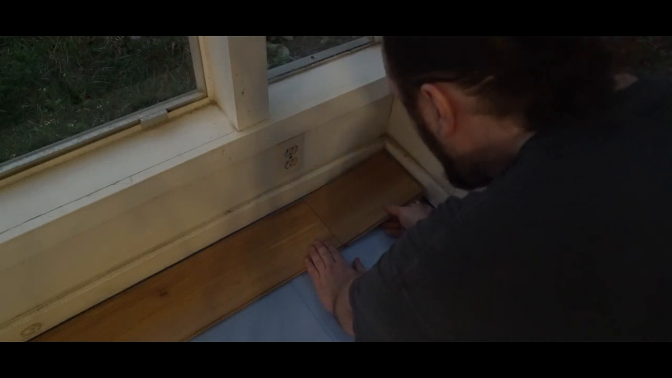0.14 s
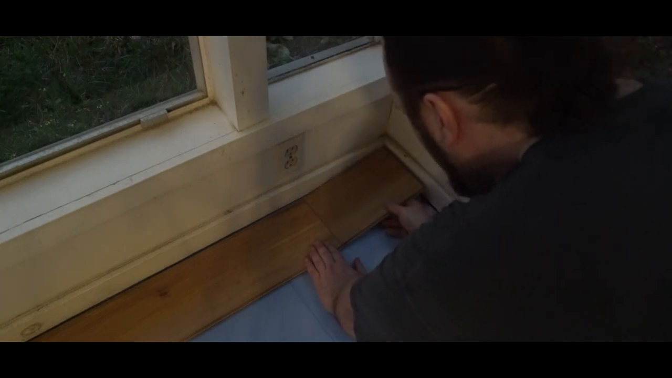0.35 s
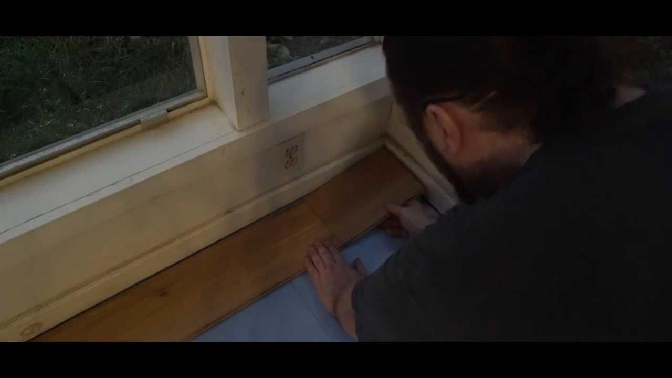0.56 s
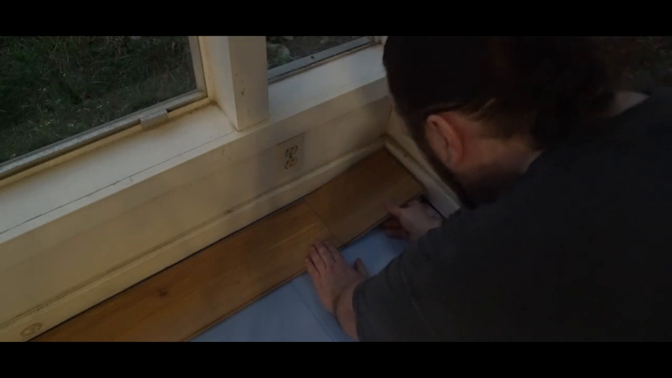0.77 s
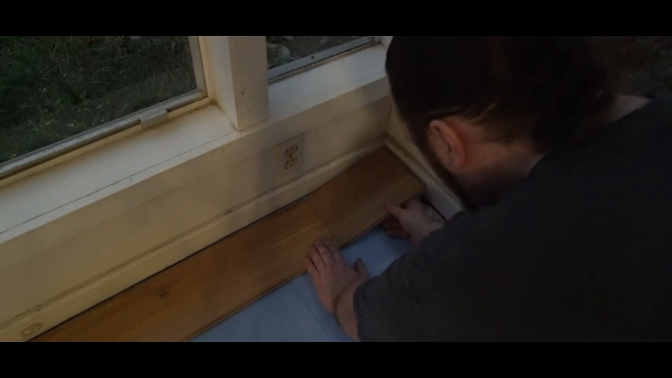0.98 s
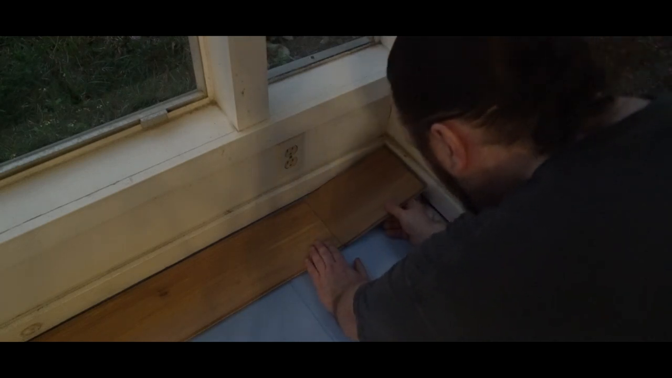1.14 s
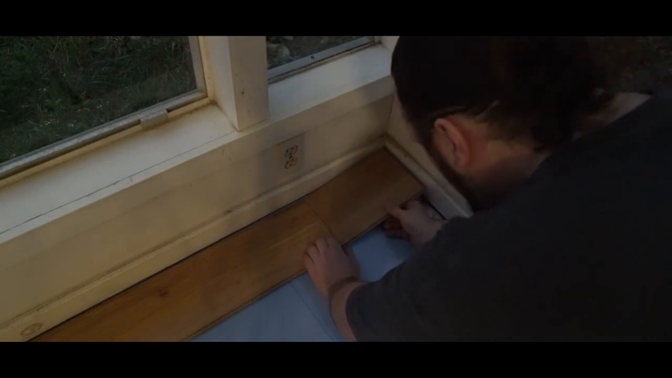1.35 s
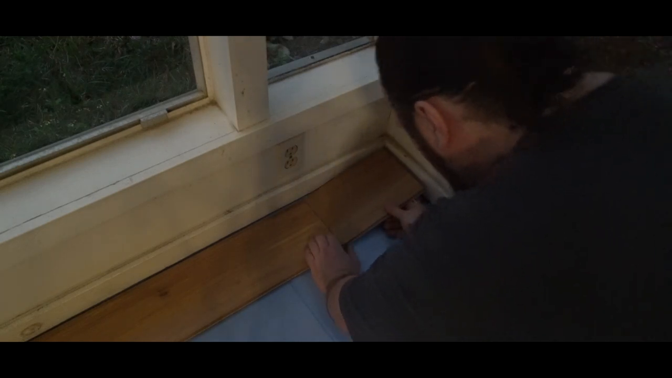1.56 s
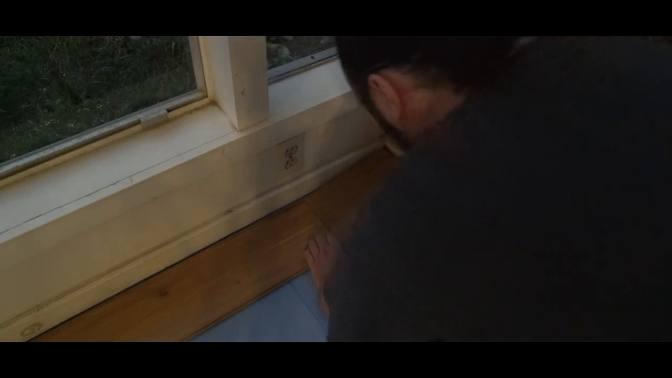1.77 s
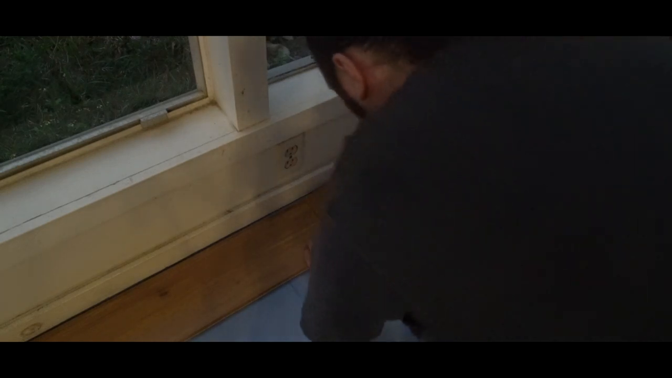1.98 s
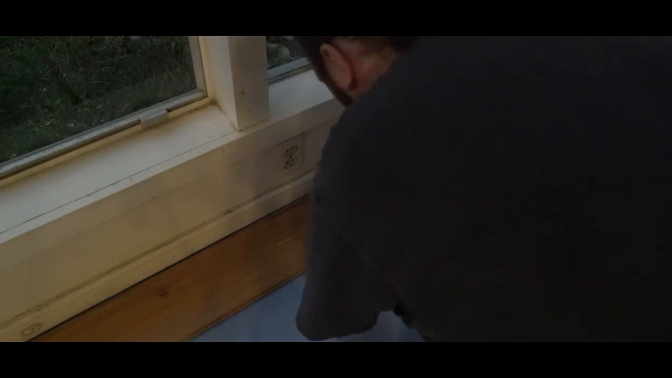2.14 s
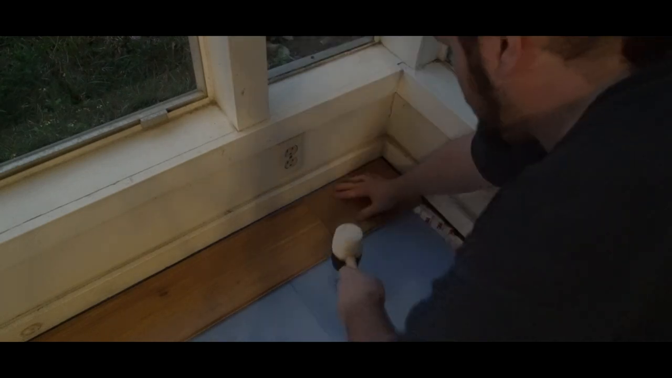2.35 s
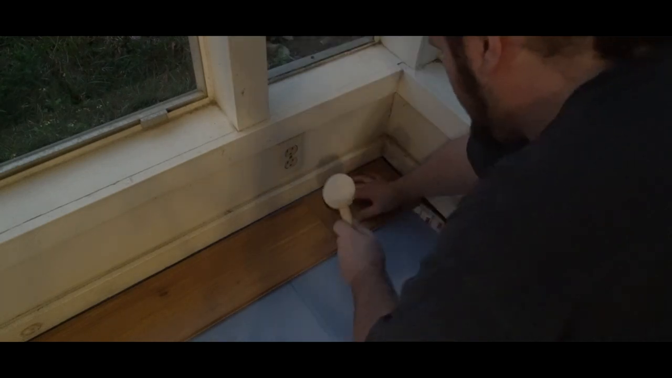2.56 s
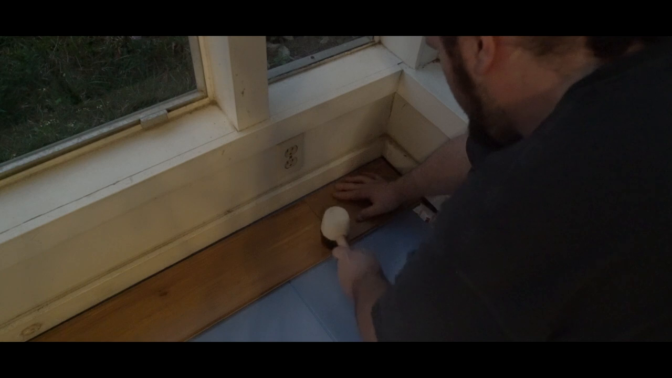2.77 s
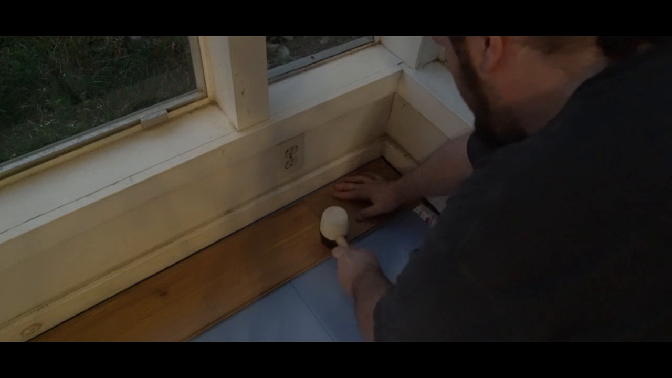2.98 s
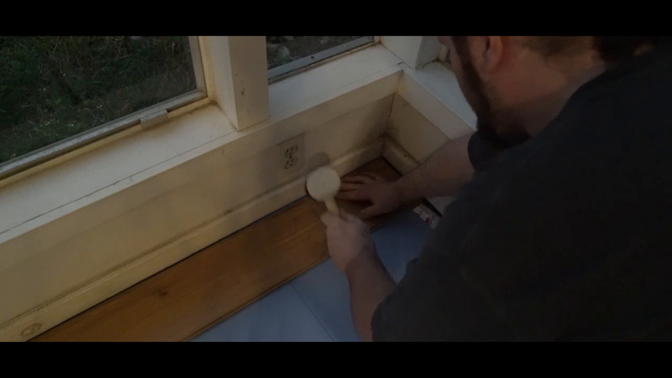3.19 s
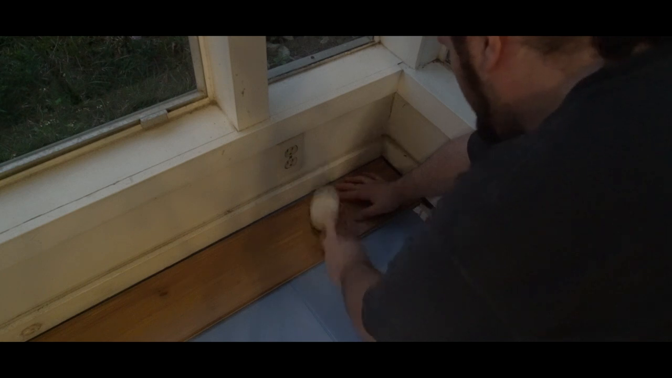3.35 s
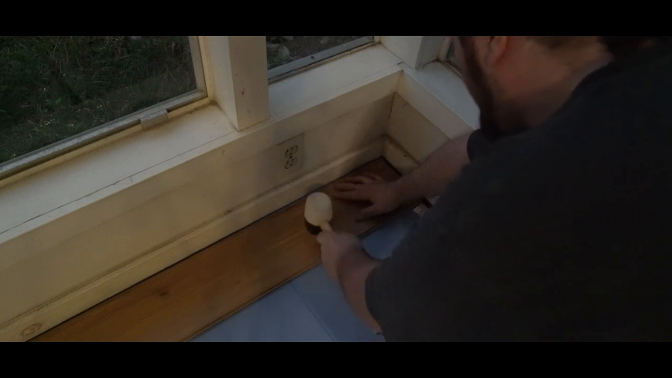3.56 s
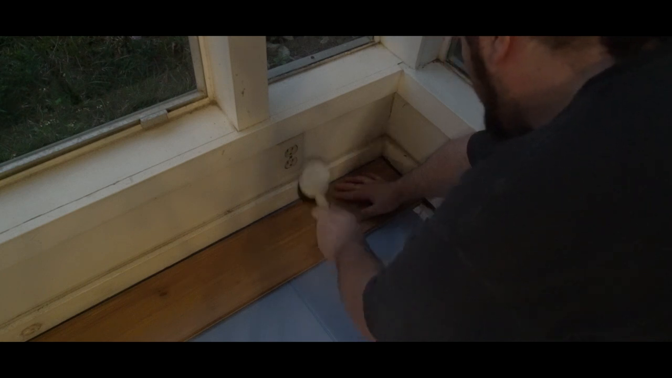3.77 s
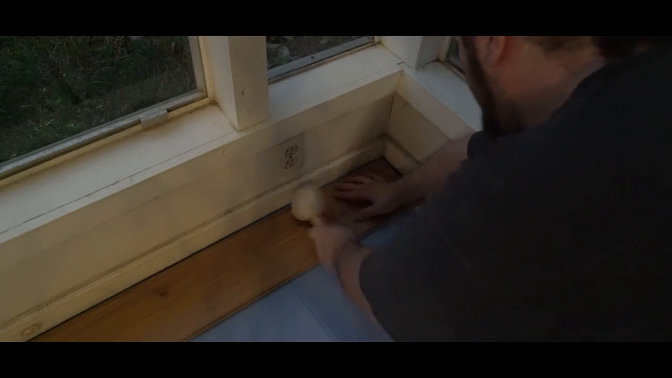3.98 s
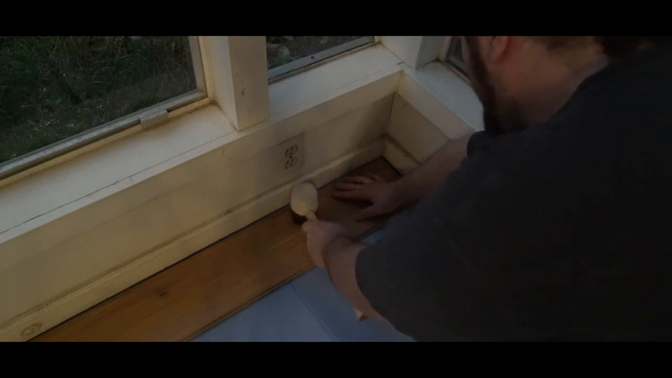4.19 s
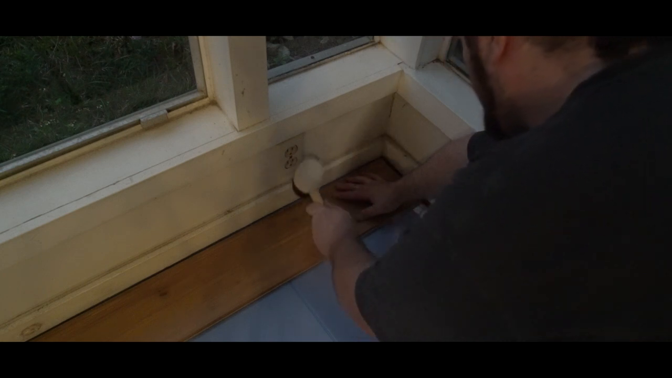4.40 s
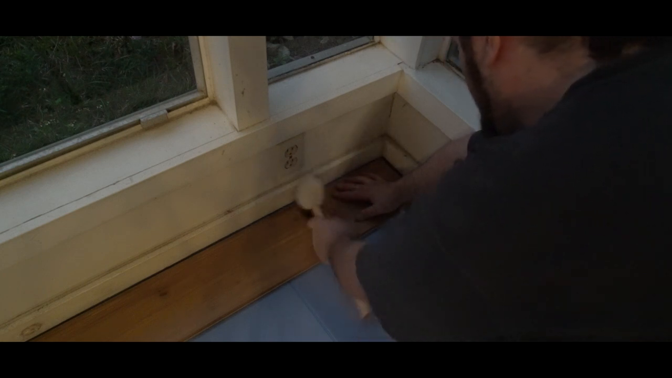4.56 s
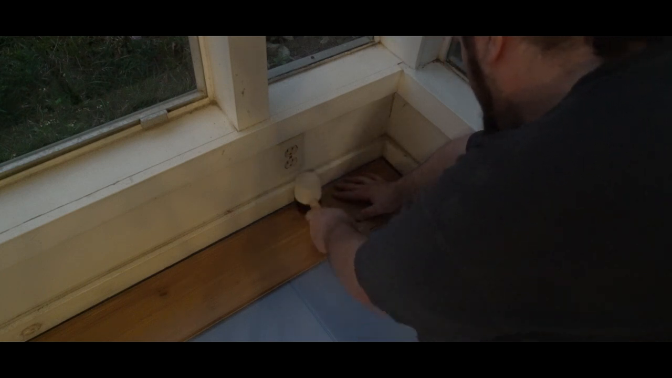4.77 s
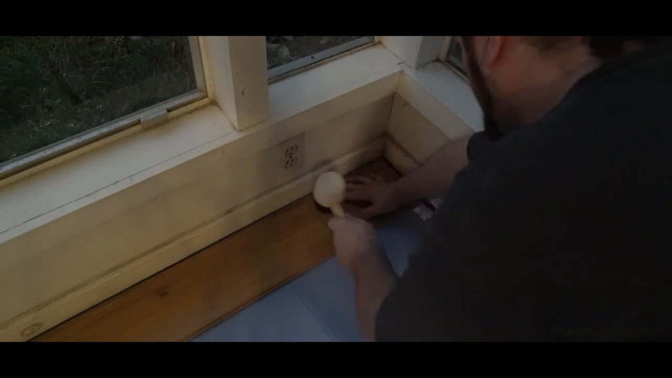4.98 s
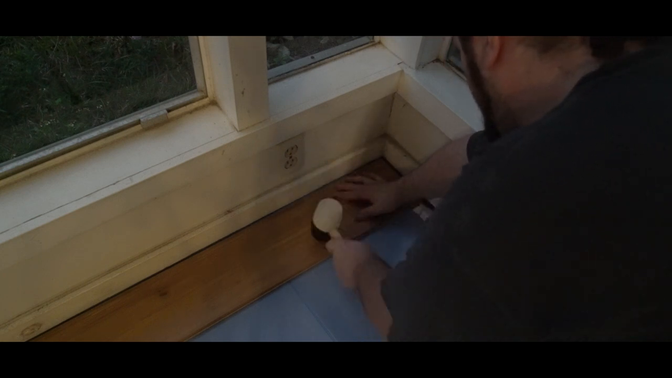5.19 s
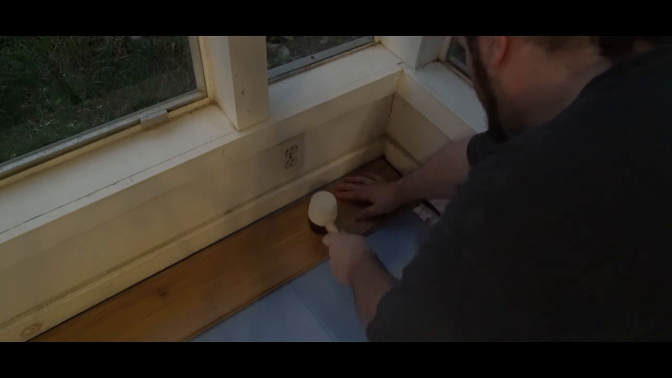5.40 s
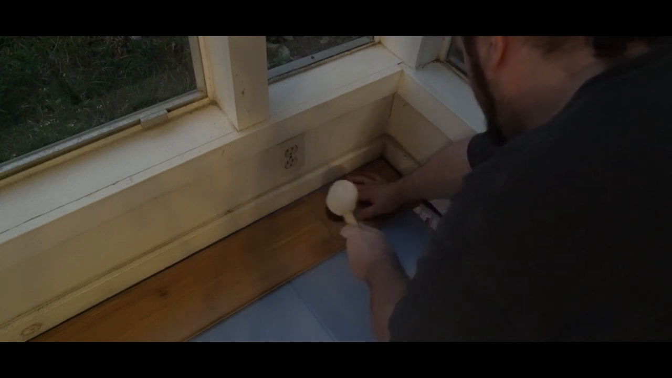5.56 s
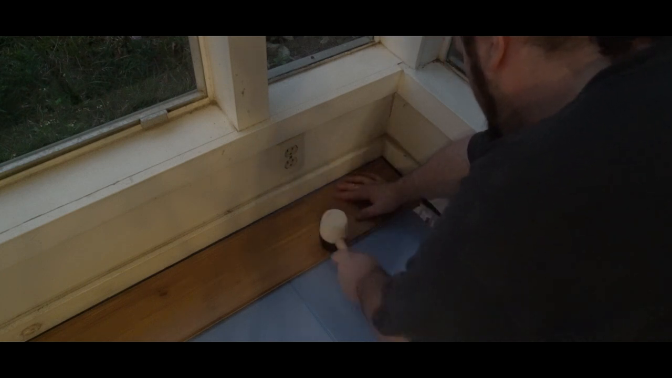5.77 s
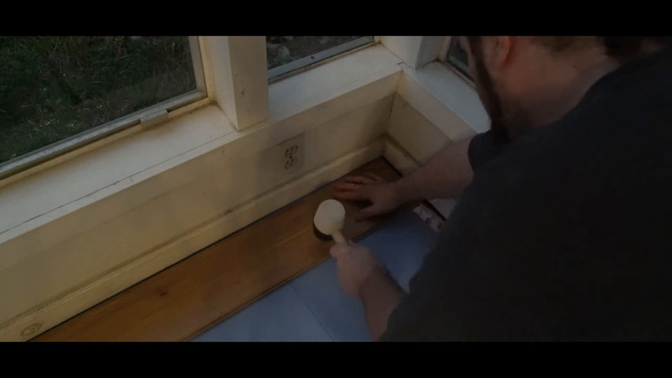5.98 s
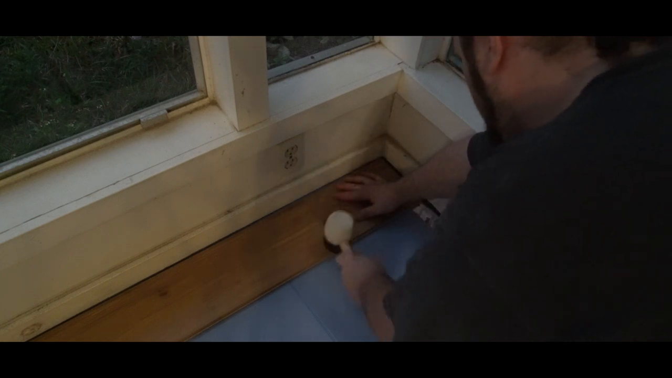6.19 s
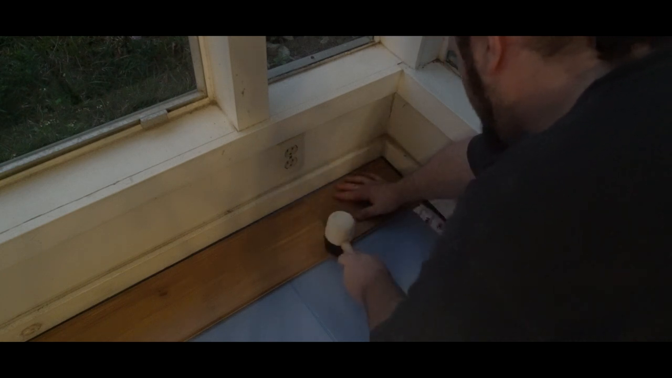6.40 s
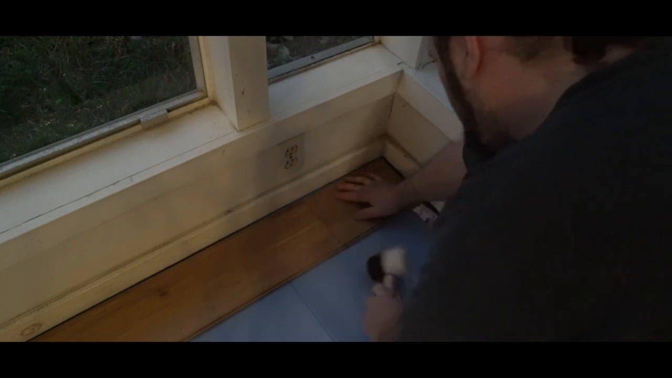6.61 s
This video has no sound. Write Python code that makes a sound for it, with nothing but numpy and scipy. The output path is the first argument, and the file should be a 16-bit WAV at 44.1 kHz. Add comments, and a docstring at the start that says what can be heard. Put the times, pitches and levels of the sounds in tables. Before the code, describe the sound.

Close in a bare, echoing room with very faint hum and hiss, hands softly rub a laminate plank; its edge squeaks thinly, the joint ticks and the board scrapes briefly. After a pause, seven very loud mallet blows crack against the wood at a steady, slightly quickening pace, each with a short woody ring and an echo lasting over half a second.

```python
"""A laminate plank is fitted in the corner of a bare, echoing room, over a faint hum and hiss that sink at 2.33 s.
Hands rub along the boards (shaped noise), the edge squeaks (blurred tones), the joint ticks (small struck modes),
and one short push slides the plank over its underlay, creeping, then giving way. From 2.7 s seven mallet blows
drive it home: each snaps and cracks, rings the plank's modes and fills the room with echo; two seating cracks
follow the first blow. The recorder's limiter ducks the peaks, so the echo swells up just after a crack."""
import sys
import numpy as np
from scipy import signal
from scipy.fft import rfft, irfft
from scipy.io import wavfile
from scipy.ndimage import minimum_filter1d

SR = 44100
rng = np.random.default_rng(int(sys.argv[2]) if len(sys.argv) > 2 else 0)


def log_audio(samples):
    """Write samples as a 16-bit WAV file to the path given in sys.argv[1]."""
    # one column per channel
    frames = np.atleast_2d(samples).T
    # limit to full scale, then quantise
    limited = np.clip(frames, -1, 1)
    pcm = np.round(limited * 32767).astype(np.int16)
    wavfile.write(sys.argv[1], SR, pcm)


N = 292779
TIME = np.arange(N) / SR
AGE = TIME[:3 * SR // 2]  # time since an impact [s]


def from_db(db):
    """Decibels to amplitude gain."""
    return 10 ** (np.asarray(db) / 20)


def rms_one(x):
    """Scale to unit power."""
    return x / np.sqrt(np.mean(x ** 2) + 1e-20)


def at_hz(points, hz):
    """Interpolate a table on a log-frequency axis."""
    freqs, values = np.transpose(points)
    return np.interp(np.log(np.maximum(hz, 1)), np.log(freqs), values)


def noise(colour, size):
    """Unit-power noise; only the shape of the colour table matters."""
    hz = np.fft.rfftfreq(size, 1 / SR)
    white = rfft(rng.standard_normal(size))
    return rms_one(irfft(white * from_db(at_hz(colour, hz)), size))


def decay(t60_s):
    """Exponential that falls 60 dB in t60_s."""
    return np.exp(-np.log(1000) * AGE / t60_s)


def ring(modes, scatter_db=1.2):
    """Struck modes of alternating sign; their strengths vary a little from hit to hit."""
    out = np.zeros(len(AGE))
    for k, (hz, db, t60_s) in enumerate(modes):
        strength = from_db(db + scatter_db * rng.standard_normal())
        out += (-1) ** k * strength * decay(t60_s) * np.sin(2 * np.pi * hz * AGE)
    return out


def bell(x, hz, q, db):
    """Lift or lower a band around hz."""
    return x + (from_db(db) - 1) * signal.lfilter(*signal.iirpeak(hz, q, fs=SR), x)


def brighten(x, hz, db):
    """Treble shelf: a harder contact is brighter."""
    return x + (from_db(db) - 1) * signal.lfilter(*signal.butter(1, hz, "high", fs=SR), x)


def high_pass(x, hz, order):
    """Take the bass away."""
    return signal.sosfilt(signal.butter(order, hz, "high", fs=SR, output="sos"), x)


def band_pass(x, low_hz, high_hz):
    """Keep the band between two frequencies."""
    return signal.sosfilt(signal.butter(2, [low_hz, high_hz], "band", fs=SR, output="sos"), x)


def add(out, at_s, sound):
    """Mix a sound in at time at_s."""
    start = round(at_s * SR)
    out[start:start + len(sound)] += sound[:N - start]


# room tone spectrum: (frequency [Hz], relative level [dB])
AIR_COLOUR = [(25, 13.5), (60, 6), (150, -1.5), (300, -0.5), (430, 5), (530, -7.5), (670, 7.5), (820, -7),
              (2000, -12), (6000, -15.5), (16000, -26)]
# mains hum: (frequency [Hz], level against the air [dB])
HUM = [(59.7, -3), (119.6, -20.5), (179.5, -20.5)]


def room_tone(air_db=-65, sinks_at_s=2.33, sink_db=5.5, sink_s=0.019, hum_sway_db=-0.5):
    """Soft indoor air with a slightly wavering mains hum; both sink together in one step."""
    hum = sum(np.sqrt(2) * from_db(db) * np.sin(2 * np.pi * hz * TIME) for hz, db in HUM)
    sway = from_db(hum_sway_db * noise([(4, -1), (10, -19.0), (40, -90)], N))
    sunk = np.clip((TIME - sinks_at_s) / sink_s, 0, 1)
    return from_db(air_db - sink_db * sunk) * (noise(AIR_COLOUR, N) + sway * hum)


def stroke(start_s, length_s, db, attack_s=0.017, fade_db_per_s=79.5):
    """Gain over time of one sliding contact: attack, hold, fade."""
    attack = np.clip((TIME - start_s) / attack_s, 0, 1)
    past_end_s = np.maximum(TIME - start_s - length_s, 0)
    return attack * from_db(db - fade_db_per_s * past_end_s)


# one push over the underlay in two stages, creeping, then giving way: (start [s], length [s], level [dB])
PUSH_STAGES = [(1.21, 0.061, -62.5), (1.284, 0.025, -58)]
# sliding spectrum: (frequency [Hz], relative level [dB])
SLIDE_COLOUR = [(120, -8), (280, 1.5), (480, 4), (700, -7), (1500, -12), (2800, -10), (4500, -5.5),
                (7000, -9.5), (11000, -23), (16000, -40)]
# hands and sleeves along the boards: (start [s], length [s], level before rub_db [dB])
RUBS = [(0, 0.11, -65), (.2, 0.087, -72), (0.391, 0.21, -69.5), (1.07, 0.84, -73.5), (1.902, 0.39, -71)]
# rubbing spectrum: (frequency [Hz], relative level [dB])
RUB_COLOUR = [(530, -38), (900, -4), (1210, -7), (1300, 0.5), (1820, -9.5), (2310, -6), (2820, -8.5),
              (3250, -1), (3650, -6), (4160, -1.5), (5080, -6.5), (8630, -21.5), (15000, -38.5)]


def handling(rub_db=-2, grain_db=1.5):
    """Friction noise of plank, hands and sleeves, uneven as the surfaces catch."""
    catch = from_db(grain_db * noise([(40, -3.5), (150, -14), (600, -44.5)], N))
    slide = sum(stroke(*stage) for stage in PUSH_STAGES) * noise(SLIDE_COLOUR, N)
    rub = from_db(rub_db) * sum(stroke(*row) for row in RUBS) * noise(RUB_COLOUR, N)
    return catch * (slide + rub)


# board edge slipping: (start [s], length [s], pitch [Hz], glide [Hz/s], level [dB])
SQUEAKS = [(0, 0.12, 4730, -5000, -69), (.06, .1, 3350, -1800, -69.5), (.41, 0.23, 3340, 3, -76),
           (2.02, 0.24, 2320, -48, -77)]


def squeaks(blur_hz=90, extra_fade_db_per_s=100):
    """Thin tones, blurred by uneven stick and slip, mostly sagging; they die faster than the rubbing."""
    out = np.zeros(N)
    blur = signal.butter(2, blur_hz, fs=SR, output="sos")
    for start_s, length_s, hz, glide_hz_per_s, db in SQUEAKS:
        pitch_hz = hz + glide_hz_per_s * np.clip(TIME - start_s, 0, length_s)
        phase = 2 * np.pi * np.cumsum(pitch_hz) / SR
        a, b = rms_one(signal.sosfilt(blur, rng.standard_normal((2, N))))
        tone = a * np.cos(phase) + b * np.sin(phase)
        fade = from_db(-extra_fade_db_per_s * np.maximum(TIME - start_s - length_s, 0))
        out += stroke(start_s, length_s, db) * fade * tone
    return out


# decay of the room: (frequency [Hz], t60 [s])
ROOM_T60 = [(80, 0.37), (200, 0.6), (500, 0.68), (1000, 0.66), (2500, 0.79), (4000, 0.73), (6000, 0.67),
            (10000, 0.48), (16000, 0.73)]


def diffuse(colour, build_s):
    """Dense reflections: they build up while each band dies at the room's own rate."""
    spectrum = rfft(noise(colour, len(AGE)))
    hz = np.fft.rfftfreq(len(AGE), 1 / SR)
    centres_hz = np.geomspace(80, 16000, 12)
    out = np.zeros(len(AGE))
    for centre_hz in centres_hz:
        weight = at_hz(np.c_[centres_hz, centres_hz == centre_hz], hz)  # overlapping triangles, sum 1
        out += irfft(spectrum * weight, len(AGE)) * decay(at_hz(ROOM_T60, centre_hz))
    return out * (1 - np.exp(-AGE / build_s))


# splintery contact spectrum, also used by plank(): (frequency [Hz], relative level [dB per Hz])
CRACK = [(300, -2), (800, 3), (1600, 2.5), (2600, -9.5), (3800, 0.5), (5500, -4), (8000, -20),
         (11000, -32.5), (16000, -36)]
# ticks of the joint: (time [s], level [dB], brightness [dB])
TICKS = [(0.077, -54, 0), (0.944, -65, 20.5), (1.016, -46, -13), (1.077, -46.5, -2), (1.586, -42, -17),
         (1.591, -45.5, -7), (1.945, -61, 2), (2.521, -66, 5.5), (3.349, -65.5, 25), (5.474, -59, 22),
         (6.622, -62, 18)]
# ring of the joint: (frequency [Hz], level [dB], t60 [s])
JOINT = [(1000, -5, 0.019), (1333, -9, 0.055), (1450, -7, 0.049), (1700, -15.5, 0.046), (2325, -11, 0.024),
         (3320, -10.5, .04), (3600, -22.5, 0.016), (4260, -8, 0.0067)]


def joint(grit_db=-13, grit_t60_s=0.088, room_db=-26, linger_db=-19, linger_t60_s=.55):
    """Tongue and groove catch with small gritty ticks; the room carries their pitches on."""
    out = np.zeros(N)
    room = from_db(room_db) * diffuse(CRACK, build_s=.005)
    for at_s, db, bright_db in TICKS:
        grit = from_db(grit_db) * noise(CRACK, len(AGE)) * decay(grit_t60_s)
        tick = ring(JOINT) + grit
        paths = rng.standard_normal(len(AGE)) * decay(linger_t60_s)
        smeared = signal.fftconvolve(tick, paths)[:len(AGE)]
        linger = from_db(linger_db) * rms_one(smeared) * np.std(paths)
        add(out, at_s, from_db(db) * brighten(tick + room + linger, 6000, bright_db))
    return out


# plank on its underlay: (frequency [Hz], level before modes_db [dB], t60 [s])
PLANK = [(146, -16, .1), (184, -17, .09), (335, -16, .07), (410, -17, .06), (528, -18, .06),
         (622, -17, .06), (750, -13, .04), (858, -10, .045), (985, -10, .04), (1045, -11, .05),
         (1270, -9, .05), (1535, -11, .04), (1685, -10, .04), (1960, -12, .02), (2299, -14, .035),
         (3116, -12, .03), (3418, -11, .03), (4178, -10, .015), (5023, -12, .012)]
# first reflections from the corner: (delay [s], level [dB])
CORNER = [(.0033, -44), (.0076, -6), (.0097, -16)]


def plank(force_db, modes_db=-7, crack_db=-12, crack_t60_s=0.046, contact_s=.0003,
          snap_db=8, hardening_db_per_db=0.23, snap_low_hz=1800, snap_high_hz=5500, radiates_hz=110):
    """Near sound of one impact: snap of the contact, crack and ring of the board, first reflections."""
    crack = from_db(crack_db) * noise(CRACK, len(AGE)) * decay(crack_t60_s)
    sound = from_db(modes_db) * ring(PLANK) + crack
    # the mallet head gives a little, so the force rises smoothly
    sound = sound * (1 - np.exp(-(AGE / contact_s) ** 2))
    # the contact clicks sharply, more sharply the harder it is struck
    snap = signal.unit_impulse(len(AGE), round(contact_s * SR))
    snap = snap * from_db(snap_db + hardening_db_per_db * force_db)
    sound = sound + band_pass(snap + 1e-18, snap_low_hz, snap_high_hz)
    # a narrow board radiates little deep bass
    sound = high_pass(sound, radiates_hz, order=3)
    # the corner walls throw the upper part straight back
    thrown = high_pass(sound, 860, order=1)
    return sound + sum(from_db(db) * np.interp(AGE - lag_s, AGE, thrown, left=0) for lag_s, db in CORNER)


# tongue cracking into the groove after the first blow: (time [s], force and level [dB])
SEATING = [(2.767, -10), (2.78, -13)]


def seating(bright_db=7, low_hz=450, high_hz=6000):
    """The joint jumps shut and sounds the plank again, thinner than the mallet does."""
    out = np.zeros(N)
    for at_s, db in SEATING:
        thin = band_pass(plank(db), low_hz, high_hz)
        add(out, at_s, from_db(db) * brighten(thin, 1700, bright_db))
    return out


def add_sizzle(sound, force_db, sizzle_hz=13500, db_per_db=4, neutral_db=-2, sizzle_t60_s=.015):
    """Brief sizzle at the start of a blow, as from overload; it grows faster than the force."""
    sizzle = bell(sound, sizzle_hz, 2.5, db_per_db * (force_db - neutral_db)) - sound
    return sound + sizzle * decay(sizzle_t60_s)


# diffuse echo of a blow: (frequency [Hz], relative level [dB per Hz])
ECHO = [(50, -22), (170, -5.5), (250, -1.5), (350, 3.5), (560, 2.5), (1000, 4), (1170, 1), (1650, 1.5),
        (2600, -1), (4200, 0), (6000, -10.5), (8500, -24.5), (12500, -39.5), (16000, -62.5)]
# standing waves of the room: (frequency [Hz], level before standing_db [dB], t60 [s])
ROOM_MODES = [(79, -11, 1.0), (118, -8, .6), (162, -1, .7), (183, 1, .75), (228, -2, .75), (264, 0, .7),
              (317, 4, .65), (335, 12, .7), (367, 5, .7), (397, 8, .65), (404, 10, .65), (424, 2, .8),
              (529, 4, .7), (622, 10, .65), (689, 11, .65), (729, 6, .85), (740, 8, .65), (761, 5, .95),
              (859, 16, .5), (984, 10, .55), (1045, 11, .6), (1269, 9, .55), (1539, 5, .8), (1606, 2, 1.0),
              (1650, 3, .9), (1686, 7, .55), (1754, 8, .55), (2299, 9, .5), (3115, 8, .5), (3418, 8, .5)]
# mallet blows: (time [s], strength [dB], thump near 200 Hz [dB], echo boom near 350 Hz [dB],
# knock [Hz], knock [dB], bite [Hz], bite [dB], brightness [dB], room [dB])
BLOWS = [(2.7328, -1, -2, 1, 1000, 2, 2700, 0, 9, -3), (3.3782, 0, -0.5, 3.5, 920, 5.5, 2700, -1.5, 3, -2),
         (3.9751, -1.5, -4, 3.5, 750, 6.5, 1850, 3, -0.5, -3.5),
         (4.5611, -1.5, -1, 5.5, 770, 5, 2030, 3, 0, -0.25),
         (5.1316, -1.5, -1, 1.5, 887, 7, 1700, 1.5, -0.5, -2),
         (5.6714, -4, -2, -6.5, 905, 4.5, 1650, 3, -4, -4.5),
         (6.1664, -3.5, 0, -4, 1000, 5, 1680, 3.5, -2.5, -2.5)]


def mallet(echo_db=-16, shared_echo=.2, standing_db=-43.5, standing_build_t60_s=.19):
    """Every blow excites the same plank and room, with its own force and hardness."""
    out = np.zeros(N)
    same_paths = diffuse(ECHO, build_s=0.0011)
    for (at_s, db, thump_db, boom_db, knock_hz, knock_db,
         bite_hz, bite_db, bright_db, room_db) in BLOWS:
        # the striking spot shifts a little, so much of the echo is new each time (shared_echo: power share)
        new_paths = diffuse(ECHO, build_s=0.0017)
        echo = np.sqrt(shared_echo) * same_paths + np.sqrt(1 - shared_echo) * new_paths
        # standing waves take a moment to form
        standing = ring(ROOM_MODES) * (1 - decay(standing_build_t60_s))
        room = from_db(echo_db) * echo + from_db(standing_db) * standing
        near = add_sizzle(plank(db), db)
        # the spot and the firmness of the contact colour the blow
        blow = bell(near, 160, 0.33, thump_db) + from_db(room_db) * bell(room, 355, 3.3, boom_db)
        blow = bell(blow, knock_hz, 1.8, knock_db)
        blow = bell(blow, bite_hz, 3.3, bite_db)
        add(out, at_s, from_db(db) * brighten(blow, 1500, bright_db))
    return out


def scene():
    """One microphone close behind the work."""
    return (room_tone() + handling() + squeaks() + joint() + seating() + mallet())[None]


def limiter(x, threshold_db=-4.5, attack_s=.0007, hold_s=0.018, release_db_per_s=800):
    """Peaks over the threshold pull the gain down; it holds briefly and springs back."""
    over_db = np.maximum(20 * np.log10(np.abs(x) + 1e-9) - threshold_db, 0)
    half = max(1, int(hold_s * SR / 2))
    held_db = -minimum_filter1d(-over_db, 2 * half + 1, origin=half)
    # running maximum on a rising ramp gives a constant release slope
    ramp_db = release_db_per_s * TIME
    cut_db = np.maximum.accumulate(held_db + ramp_db) - ramp_db
    pole = np.exp(-1 / (attack_s * SR))
    return x * from_db(-signal.lfilter([1 - pole], [1, -pole], cut_db))


def record(dry, ceiling=.68, coupling_hz=70, cutoff_hz=16500):
    """The first swings outrun the limiter and clip; deep bass and the top are cut."""
    clipped = np.clip(limiter(dry[0]), -ceiling, ceiling)
    coupled = high_pass(clipped, coupling_hz, order=2)
    top_cut = signal.ellip(10, .2, 80, cutoff_hz, fs=SR, output="sos")
    return signal.sosfilt(top_cut, coupled)[None]


dry = scene()
out = record(dry)
log_audio(out)
```